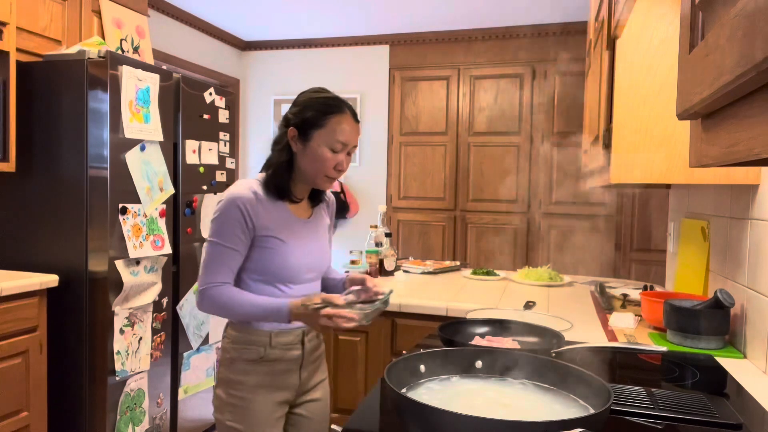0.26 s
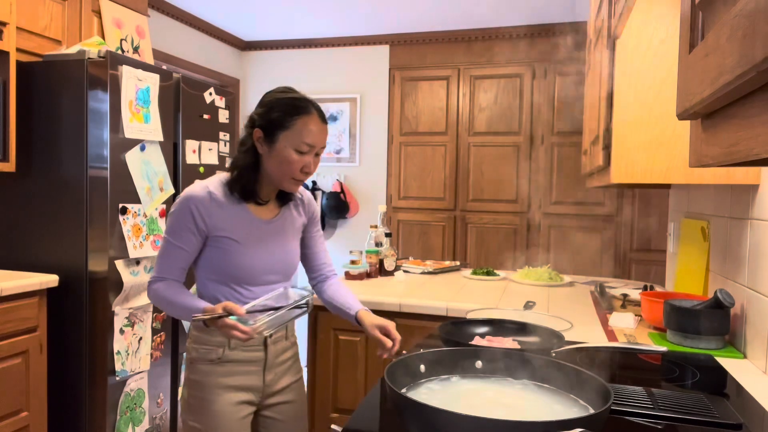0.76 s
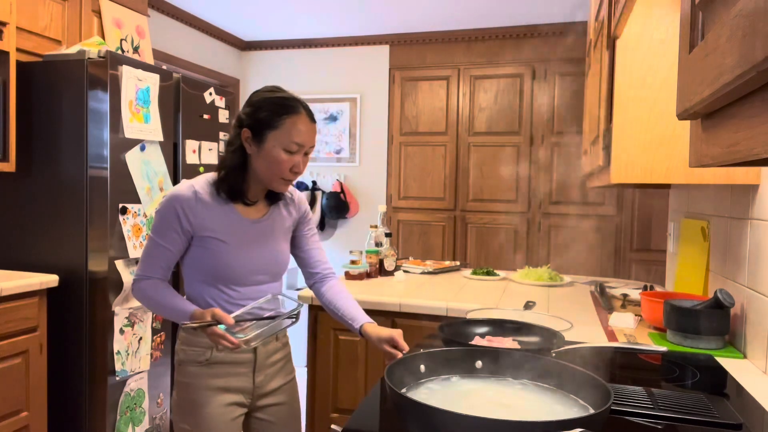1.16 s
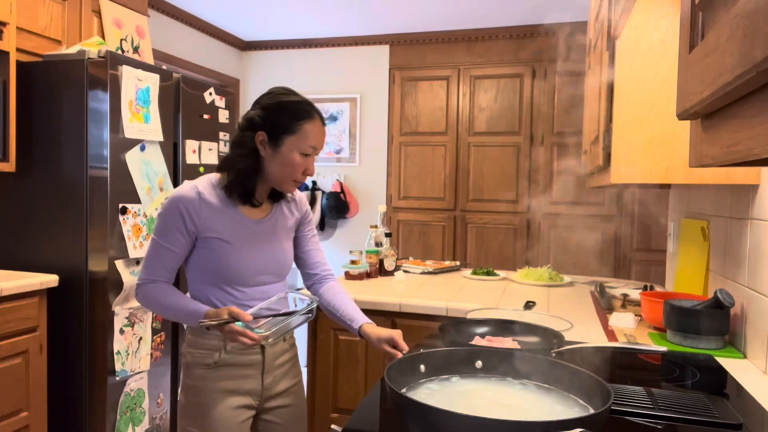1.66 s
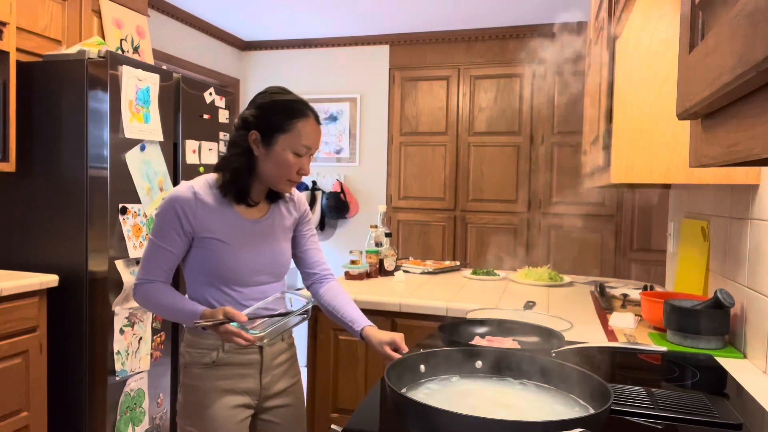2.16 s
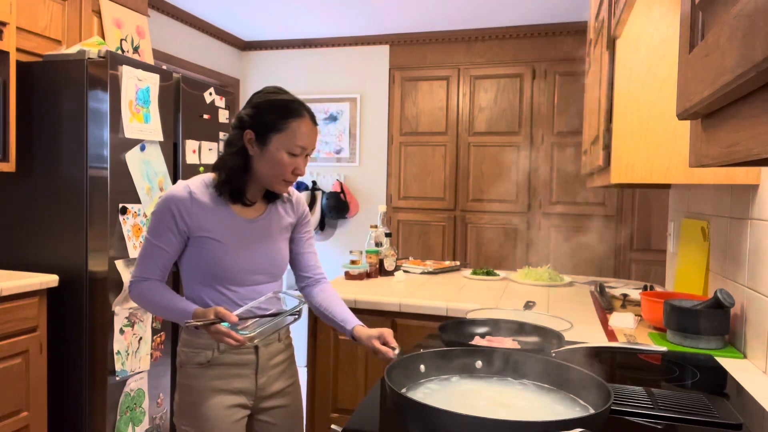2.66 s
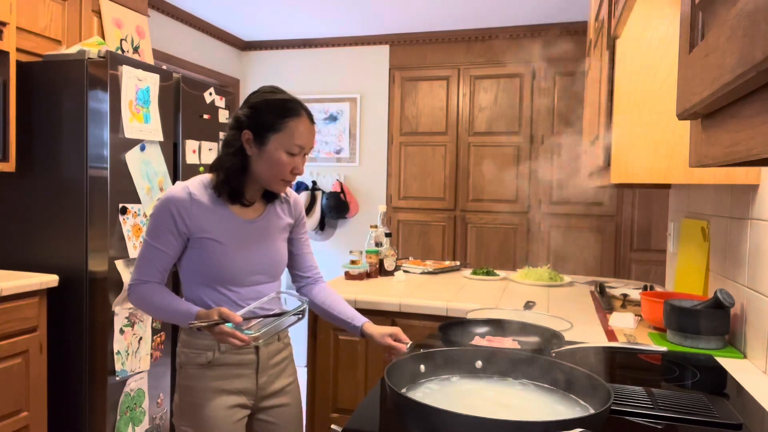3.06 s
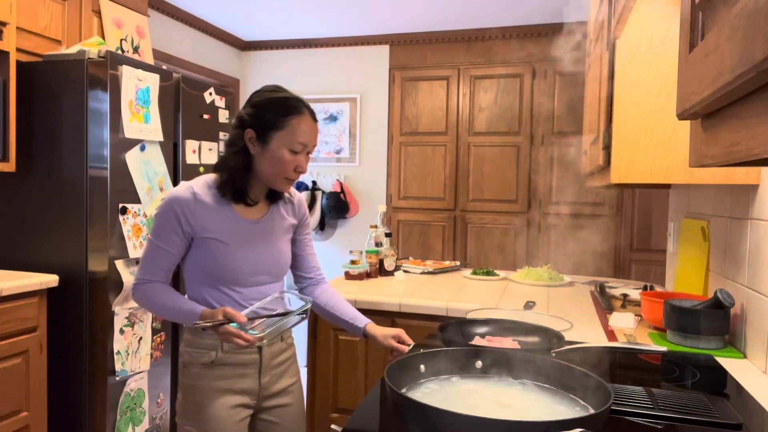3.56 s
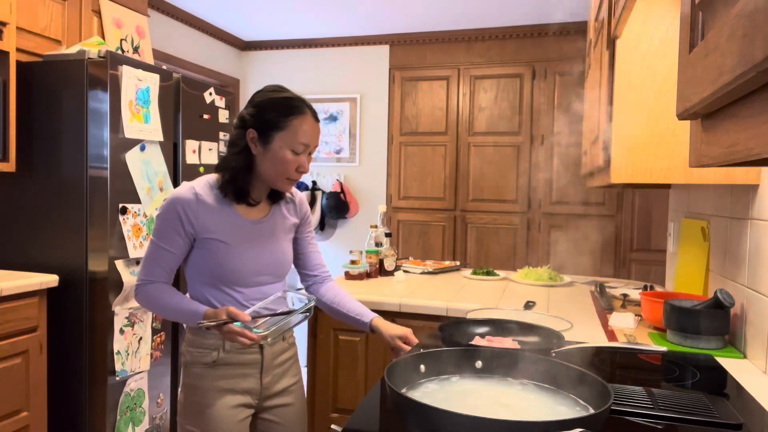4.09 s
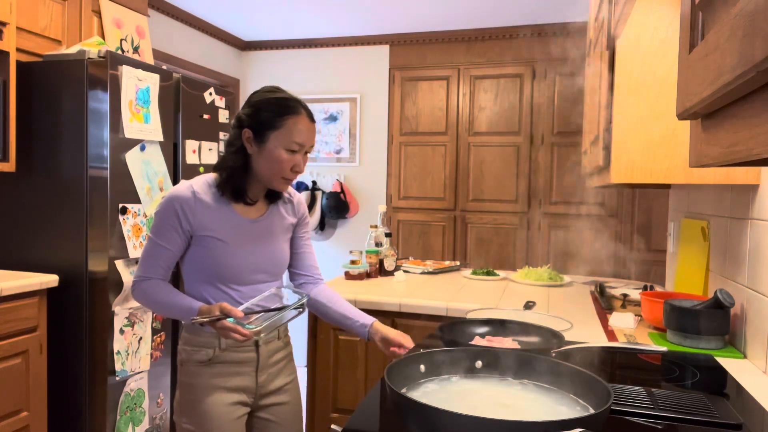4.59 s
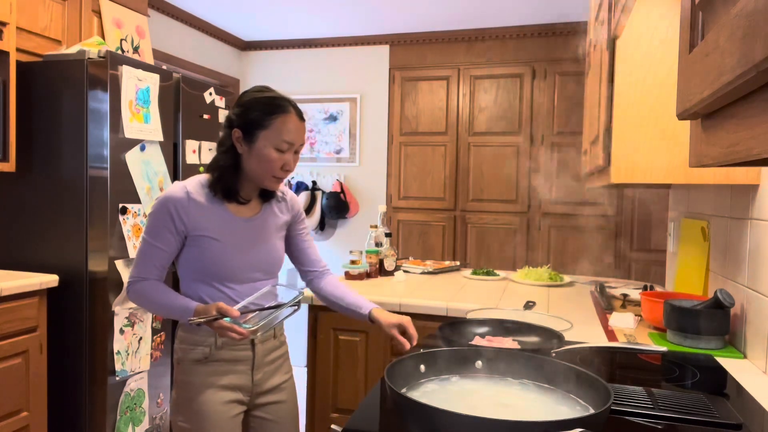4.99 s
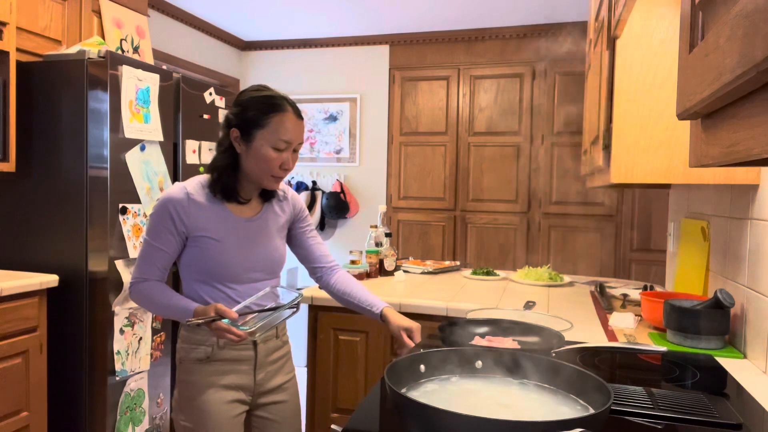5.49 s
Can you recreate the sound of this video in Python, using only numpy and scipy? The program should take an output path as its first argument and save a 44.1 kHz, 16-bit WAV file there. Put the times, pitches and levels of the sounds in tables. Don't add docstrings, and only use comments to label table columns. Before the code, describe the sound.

In a tiled home kitchen, a low extractor fan rumbles throughout with a very faint high whine from the hob. Tongs click brightly on a glass dish at the start. After a quiet gap with a dull rub and a small tick, they knock a frying pan, thud, scrape heavily, clash and tap, with soft worktop thumps. A stereo microphone stands nearby in the room.

```python
import sys
import numpy as np
from scipy import signal
from scipy.fft import rfft, irfft, next_fast_len
from scipy.io import wavfile
from scipy.ndimage import uniform_filter1d

SR = 44100
rng = np.random.default_rng(int(sys.argv[2]) if len(sys.argv) > 2 else 0)


def gain_from_db(level_db):
    decades = np.asarray(level_db, float) / 20
    return 10 ** decades


def generate_wav(sig):
    pcm = np.round(np.clip(np.atleast_2d(sig).T, -1, 1) * 32767).astype(np.int16)
    wavfile.write(sys.argv[1], SR, pcm)


N = 253134

BAND_EDGES = (200, 800, 2600, 6000, 10500, 15800)
# f/Hz, level/dB
TONG_CLICK = [(120, -13), (250, -3), (440, 2), (700, -8.5), (950, -23.5), (1500, -13), (2300, -15.5),
              (3300, -4.5), (4500, -11.5), (7000, -21.5), (8000, -18.5), (9800, -22.5), (11400, -76),
              (12400, -28), (14500, -24), (15800, -30)]
# f/Hz, level/dB
PAN_CLICK = [(120, -21), (250, -8.5), (480, 5.5), (750, -8), (950, -7.5), (1500, -4), (2500, -9),
             (3500, -18), (5300, -21.5), (8500, -25), (9800, -34), (11400, -54), (12400, -35), (14500, -34),
             (15800, -39)]


def pan_knocks():
    # f/Hz, level/dB, time to fade by 60 dB t/s
    pan_tones = [(264, -11, .12), (430, 0, .12), (510, -2, .12), (645, -7, .1), (770, -10, .1),
                 (1150, -8, .06), (1530, -3, .08), (1640, -10, .1), (1836, -9, .1), (2110, -12, .12),
                 (2300, -14, .12), (2480, -11, .14), (2780, -14, .1), (2980, -14, .1), (3430, -18, .08),
                 (4520, -21, .08), (5110, -20, .06), (5880, -24, .08)]
    # t/s, body level/dB, thud over body level/dB, hardness per band upward level/dB
    knocks = [
        (3.1685, -25, -7.5, -1.9),
        (3.613, -40.5, 12.5, -1.5),
        (4.192, -28.5, 2.5, 1.25),
        (4.611, -39.5, -19, -4.5),
        (4.619, -34, 5.5, -3.5),
    ]
    # t/s, level/dB, level/dB, level/dB
    taps = [
        (4.774, -44, 0.88, .1),
    ]
    heavy = blows(knocks, (-8, -15.5, -29), pan_tones, PAN_CLICK,
                  rattle=0.0036, ring_db=-0.5, direct_db=-9.5, trim_db=-9.5)
    light = blows(taps, (0, -6, -12.5), pan_tones, PAN_CLICK,
                  rattle=0.0032, ring_db=-12, direct_db=-14, trim_db=-9.0)
    return heavy + light


def dish_clicks():
    # f/Hz, level/dB, time to fade by 60 dB t/s
    glass_tones = [(1776, -9, .1), (2019, -8, .36), (2042, -10, .25), (2686, -16, .15), (2988, -10, .25),
                   (3268, -5, .24), (3230, -8, .2), (3350, -9, .12), (5420, -16, .12), (3310, 5, .05),
                   (3833, -14, .12), (4100, -8, .03), (4721, -34, .1), (5109, -14, .2), (5238, -10, .17),
                   (5609, -12, .15), (5680, -16, .1), (6918, -12, .06), (7381, -22, .1), (8834, -38, .05),
                   (13160, -20, .15)]
    # f/Hz, level/dB
    glass_click = [(350, -34), (600, -20.5), (969, -9), (2030, 1.5), (2490, -9.5), (3320, -11.5),
                   (7550, -26.5), (10300, -24.5), (13600, -43), (15800, -71)]
    # t/s, body level/dB, thud over body level/dB, hardness per band upward level/dB
    clicks = [
        (.0835, -35, -21, -1.8),
    ]
    # t/s, level/dB, level/dB, level/dB
    earlier_clicks = [
        (-0.062, -50, -35, 0.1),
    ]
    earlier = blows(earlier_clicks, (2.1, 1.6, -5), glass_tones, TONG_CLICK,
                    rattle=0.028, ring_db=-2.5, direct_db=-15.5, trim_db=-1.5)
    clear = blows(clicks, (8.8, -3.5, -27), glass_tones, glass_click,
                  rattle=0.0058, ring_db=9.5, direct_db=0, trim_db=-6.5)
    return earlier + clear


def tong_clash():
    # f/Hz, level/dB, time to fade by 60 dB t/s
    arm_tones = [(425, 0, .12), (1150, -8, .06), (1270, -8, .08), (1530, -8, .08), (1830, -15, .07),
                 (2638, -12, .08), (2960, -10, .08), (3235, -7, .12), (3280, -2, .1), (3420, -5, .06),
                 (3560, -7, .06), (3805, -12, .1), (4610, -18, .08), (5405, -17, .1), (5712, -13, .1),
                 (5900, -16, .08), (7780, -12, .16), (7812, -15, .12), (7930, -13, .1), (8070, -12, .14),
                 (8107, -11, .16), (8230, -13, .1), (8382, -13, .15), (8904, -16, .08), (12530, -22, .1),
                 (13520, -19, .1), (14347, -10, .14)]
    # t/s, body level/dB, thud over body level/dB, hardness per band upward level/dB
    clashes = [
        (3.9855, -28.5, -0.14, 0.1),
    ]
    return blows(clashes, (-0.4, -0.65, -2.5), arm_tones, TONG_CLICK,
                 rattle=0.065, ring_db=-0.5, direct_db=-1.5, trim_db=-5.0)


def tong_tips():
    # f/Hz, level/dB, time to fade by 60 dB t/s
    tip_tones = [(1160, -2, .05), (2480, -3, .06), (2950, -2, .06), (3200, 0, .07), (3800, -4, .08),
                 (4530, -1, .07), (9300, -12, .04)]
    ticks = [(2.466, -50.5, 4, .1)]  # t/s, body level/dB, thud level/dB, hardness level/dB
    return blows(ticks, (2.3, -12.5, -1.6), tip_tones, TONG_CLICK,
                 rattle=0.004, ring_db=-1, direct_db=-12, trim_db=-7.5)


def blows(hits, treble_db, modes, crack, rattle, ring_db, direct_db, trim_db):
    out, t = np.zeros((2, N)), np.arange(SR // 3) / SR
    hz, db, t60 = np.transpose(modes)[:, :, None]
    snap = causal(1. * (t == 0), crack)[0]
    bounces = np.exp(-(t / rattle) ** 2) * (1 - np.exp(-t / 0.0006))
    for start, body_db, thud_db, hard_db in hits:
        level_chance, phase_chance = rng.standard_normal((2, len(modes), 1))
        chatter = causal(rng.standard_normal(len(t)) * bounces, crack)[0]
        fading = gain_from_db(db + 2 * level_chance - 60 * t / t60)
        ring = np.sum(fading * np.sin(2 * np.pi * hz * t + phase_chance), axis=0)
        ring = ring * (1 - np.exp(-t / (rattle / 4)))
        ring = gain_from_db(ring_db) * ring / ring.std()
        near = chatter / chatter.std() + ring
        far = snap / snap.std() + ring / 2
        heard = room(near, far, direct_db, build_s=rattle / 2)
        upper_db = treble_db + hard_db * np.arange(1, 4)
        band_db = body_db + trim_db + np.array([thud_db, 0, *upper_db])
        add(out, colour(heard, band_db), start)
    return out


def scrapes(grains_per_s=3000, spread_db=3):
    # start t/s, length t/s, level/dB, lightness per band upward level/dB
    strokes = [
        (0.197, 0.19, -79, 9.5),
        (2.109, 0.07, -48.5, -8.5),
        (3.42, 0.048, -43, -0.5),
        (3.458, 0.095, -36.5, -5),
        (4.406, 0.036, -50, -1),
        (4.48, .15, -56.5, 4.5),
        (4.589, 0.095, -61, 7.5),
        (5.202, 0.082, -65, 4.5),
        (3.144, 0.016, -63, 7),
        (3.963, 0.012, -48.5, 7.5),
    ]
    heavy_drag = (-4, -11.5, -20.5, -32.5, -30)
    out = np.zeros((2, N))
    for start, length, level_db, light_db in strokes:
        t = np.arange(0, length, 1 / SR)
        slips = rng.random(SR // 4) < grains_per_s / SR
        strength = gain_from_db(spread_db * rng.exponential(size=SR // 4))
        ticks = slips * rng.standard_normal(SR // 4) * strength
        ticks = causal(ticks[:len(t)], PAN_CLICK)[0]
        drag = 0
        for k, db in enumerate(heavy_drag):
            lo, hi = BAND_EDGES[k], BAND_EDGES[k + 1]
            part = band(band(ticks, lo, hi), lo, hi)
            drag = drag + part / part.std() * gain_from_db(db + k * light_db)
        pressure_db = np.interp(t / length, (0, .7, 1), (-8, 0, -4))
        drag = drag * gain_from_db(level_db + pressure_db) * np.hanning(len(t)) ** 0.17
        add(out, room(drag, drag, direct_db=-16, build_s=0.0081), start)
    return out


def thumps():
    # t/s, level/dB, f/Hz, time to fade by 60 dB t/s
    knocks = [
        (2.127, -49, 1137, 0.054),
        (2.466, -49, 1130, 0.072),
        (3.997, -30, 69.7, 0.31),
        (4, -43, 170, 0.29),
        (4.006, -47, 249, 0.12),
        (4.197, -42, 252, 0.193),
        (4.2, -43, 450, .15),
        (3.186, -40.5, 532, 0.27),
        (4.788, -36, 236, 0.073),
        (4.891, -32, 110.7, 0.37),
    ]
    out, t = np.zeros((2, N)), np.arange(SR // 2) / SR
    for start, db, hz, t60 in knocks:
        swell = 1 - np.exp(-t * hz)
        knock = np.sin(2 * np.pi * hz * t) * gain_from_db(db - 60 * t / t60) * swell
        add(out, ports(knock, -.25 * knock), start)
    return out


def squeaks():
    # start t/s, end t/s, f/Hz, level/dB
    tones = [
        (3.487, 3.551, 769, -48),
        (4.5, 4.56, 1896, -65.5),
        (5.235, 5.29, 1820, -73),
    ]
    out = np.zeros((2, N))
    for start, end, hz, db in tones:
        t = np.arange(0, end - start, 1 / SR)
        squeak = gain_from_db(db) * np.sin(2 * np.pi * hz * t) * np.hanning(len(t)) ** 0.057
        add(out, ports(squeak, 0.2 * squeak), start)
    return out


def fan(flicker_db=2.28, lean=-0.33):
    # f/Hz, level/dB per Hz
    sum_noise = [(15, -68.5), (30, -27), (55, -7), (125, -2.5), (175, -14), (195, -19), (400, -22.5),
                 (730, -25), (760, -29.5), (950, -34.5), (1250, -30.5), (2000, -45.5), (5000, -56.5),
                 (16000, -65)]
    # f/Hz, level/dB per Hz
    difference_noise = [(15, -79.5), (30, -44), (110, -13.5), (195, -19), (262, -16), (372, -18),
                        (720, -18), (1000, -32.5), (1400, -34), (2460, -49), (5500, -56.5), (9500, -62),
                        (11500, -45), (16000, -69)]
    # f/Hz, width f/Hz, sum level/dB, difference level/dB
    resonances = [(127.7, 35.8, 9.5, 5.5), (155.8, 8.7, 8.5, 6.5), (246.1, 20, 6, 11), (355.5, 43, 9, -1),
                  (419.4, 23, 11.5, 1.5), (496, 29, 7.5, -13), (633.5, 32, 8, -6.5), (676.4, 21, 7, 3),
                  (1402, 1.7, 14.5, -9.5), (6890, 160, 7.5, 15), (6770, 350, 6.5, -2),
                  (11600, 400, 14.5, 6.5), (12770, 600, 16.5, 4), (13800, 1200, 5, 2.5)]
    size = next_fast_len(N)
    hz = np.fft.rfftfreq(size, 1 / SR)
    pair = []
    for k, (table, db) in enumerate(((sum_noise, -45), (difference_noise, -53.5))):
        peaks_db = sum(row[2 + k] / (1 + (2 * (hz - row[0]) / row[1]) ** 2) for row in resonances)
        spectrum = rfft(rng.standard_normal(size)) * gain_from_db(shape(table, hz) + peaks_db)
        air, swell_db = 0, .4 * walk(1.5)
        for octave in range(4, 15):
            part = irfft(spectrum * octave_share(hz, octave), size)[:N]
            air = air + part * gain_from_db(flicker_db * walk(8.8) + swell_db)
        pair.append(air / air.std() * gain_from_db(db))
    mid, side = pair
    surge = gain_from_db(-1.28 * walk(4.5))
    mid = mid + band(mid, 31, 260) * (surge - 1)
    return ports(mid, side + lean * band(mid, 20, 330))


def hob(mains_hz=59.98, scatter_db=2.5, waver_db=1.5):
    # f/Hz, width f/Hz, sum level/dB, difference level/dB
    coil_tones = [(6745, 130, -95, -89), (7230, 200, -95, -100), (9950, 150, -114, -106),
                  (10900, 400, -112, -98), (11370, 130, -90, -79), (11580, 100, -97, -89),
                  (12070, 130, -91, -89), (12290, 200, -91, -91)]
    hz = np.arange(108, 212) * mains_hz
    comb = rng.standard_normal((3, len(hz)))
    out, size = 0, next_fast_len(N)
    places = np.round(hz * size / SR).astype(int)
    for centre_hz, width, mid_db, side_db in coil_tones:
        spectrum = np.zeros((2, size // 2 + 1), complex)
        resonance = 1 / np.sqrt(1 + (2 * (hz - centre_hz) / width) ** 4)
        lines = gain_from_db(scatter_db * comb[:2]) * np.exp(3j * comb[2]) * resonance
        spectrum[:, places] = lines * gain_from_db(np.array([[mid_db], [side_db]]))
        out = out + irfft(spectrum, size)[:, :N] * size / 2 * gain_from_db(waver_db * walk(4))
    return ports(*out)


def room(near, far, direct_db, build_s):
    # f/Hz, t/s
    fade_times = [(100, 0.3), (500, 0.4), (2000, 0.38), (6000, 0.46), (15000, 0.13)]
    # f/Hz, level/dB
    echo_width = [(200, -3.5), (600, 4.5), (1300, 1), (3300, 1), (9300, 0.5), (11000, 11), (12400, 5.5),
                  (14400, 3)]
    t = np.arange(SR // 2) / SR
    hz = np.fft.rfftfreq(len(t), 1 / SR)
    noise = rfft(rng.standard_normal((2, len(t))))
    noise[1] *= gain_from_db(shape(echo_width, hz))
    clumps = rng.standard_normal((16, 200))
    tail = 0
    for octave in range(6, 15):
        centre_hz = 2. ** octave
        clump_db = 1.5 * np.interp(t / 0.0073, np.arange(200), clumps[octave])
        fade_db = -60 * t / shape(fade_times, centre_hz)
        gather = 1 - np.exp(-t / (build_s + 1.7 / centre_hz))
        part = irfft(noise * octave_share(hz, octave), len(t))
        tail = tail + part * gain_from_db(fade_db + clump_db) * gather
    tail = tail * (1 + gain_from_db(-7.5) * np.exp(-t / 0.022))
    heard = signal.fftconvolve(ports(*tail) / np.sqrt(SR * 0.031), far[None], axes=1)
    direct = gain_from_db(direct_db) * near
    heard[0, 1:1 + len(near)] += direct
    heard[1, :len(near)] += direct
    return heard


def colour(x, band_db):
    hz = np.fft.rfftfreq(x.shape[1], 1 / SR)
    spectrum, tilt = rfft(x.mean(axis=0)), []
    for lo, hi, db in zip(BAND_EDGES, BAND_EDGES[1:], band_db):
        power = irfft(spectrum * (hz > lo) * (hz < hi)) ** 2
        gain_db = db - 10 * np.log10(uniform_filter1d(power, SR // 100).max())
        tilt += [(lo * 1.15, gain_db), (hi / 1.15, gain_db)]
    return causal(x, tilt)


def causal(x, table):
    size = 4096
    cep = irfft(shape(table, np.fft.rfftfreq(size, 1 / SR)) * np.log(10) / 20)
    cep[1:size // 2] *= 2
    cep[size // 2 + 1:] = 0
    response = irfft(np.exp(rfft(cep)))
    return signal.fftconvolve(np.atleast_2d(x), response[None], axes=1)[:, :np.shape(x)[-1]]


def shape(table, hz):
    f, v = np.transpose(table)
    return np.interp(np.log(hz + 1), np.log(f), v)


def octave_share(hz, octave):
    return np.clip(1 - np.abs(np.log2(hz + 1) - octave), 0, 1)


def band(x, lo_hz, hi_hz):
    return signal.sosfilt(signal.butter(2, (lo_hz, hi_hz), "band", fs=SR, output="sos"), x)


def walk(rate):
    k = int(SR / rate)
    steps = np.repeat(rng.standard_normal(N // k + 1), k)
    return 1.64 * uniform_filter1d(uniform_filter1d(steps, k), k)[:N]


def add(out, x, s):
    i = int(s * SR)
    x = x[:, max(-i, 0):N - i]
    out[:, max(i, 0):max(i, 0) + x.shape[1]] += x


def ports(mid, side):
    return np.array([mid + side, mid - side])


def scene():
    struck = pan_knocks() + dish_clicks() + tong_clash() + tong_tips()
    return struck + scrapes() + thumps() + squeaks() + fan() + hob()


def top_cut(x):
    return signal.sosfilt(signal.butter(12, 16030, fs=SR, output="sos"), x)


def record(dry):
    # from f/Hz, to f/Hz, level/dB
    sum_deaf = [(10040, 11000, -40), (15150, 22050, -22)]
    # from f/Hz, to f/Hz, level/dB
    difference_deaf = [(7600, 9000, -24), (12650, 14200, -24), (14500, 15750, -8), (15750, 22050, -40)]
    size = next_fast_len(N + SR // 4)
    hz, pair = np.fft.rfftfreq(size, 1 / SR), []
    mid, side = (dry[0] + dry[1]) / 2, (dry[0] - dry[1]) / 2
    for x, deaf in ((mid, sum_deaf), (side, difference_deaf)):
        loss_db = sum(1. * db * (hz > lo) * (hz < hi) for lo, hi, db in deaf)
        loss_db = uniform_filter1d(loss_db, size=700)
        pair.append(irfft(rfft(x, size) * gain_from_db(loss_db), size)[:N])
    return top_cut(ports(*pair))


dry = scene()
out = record(dry)
generate_wav(out)
```